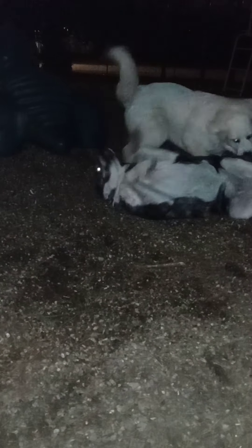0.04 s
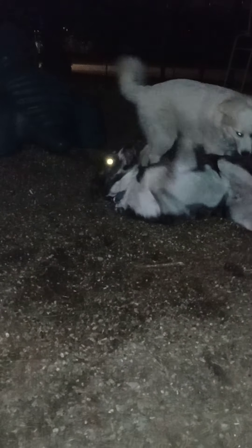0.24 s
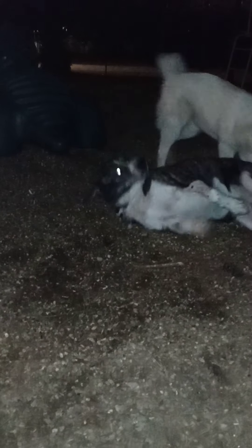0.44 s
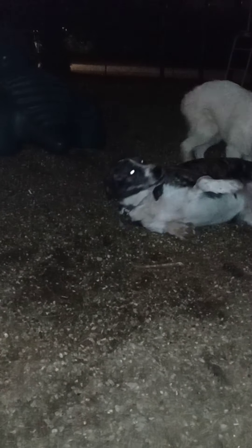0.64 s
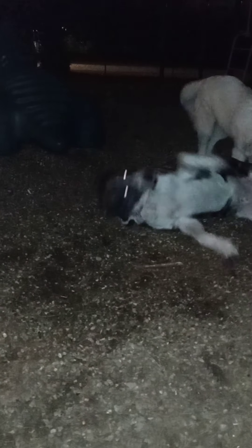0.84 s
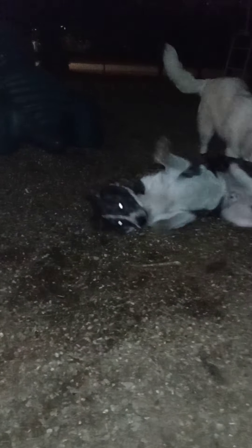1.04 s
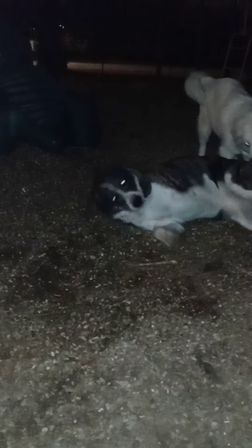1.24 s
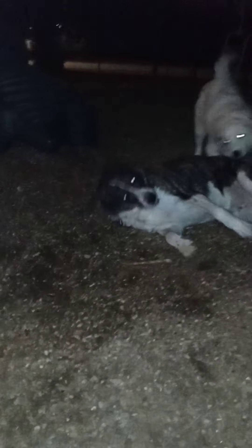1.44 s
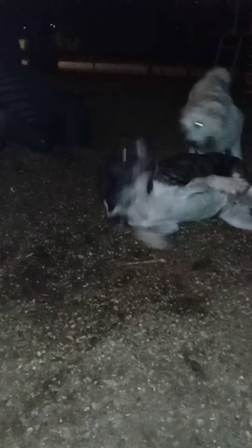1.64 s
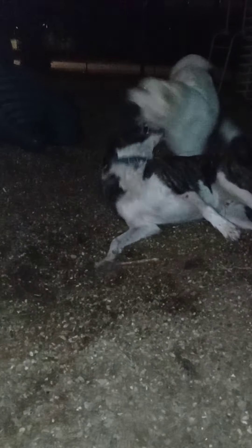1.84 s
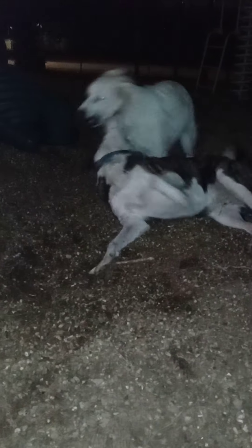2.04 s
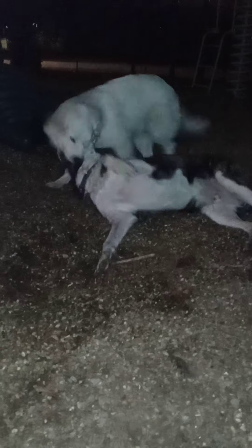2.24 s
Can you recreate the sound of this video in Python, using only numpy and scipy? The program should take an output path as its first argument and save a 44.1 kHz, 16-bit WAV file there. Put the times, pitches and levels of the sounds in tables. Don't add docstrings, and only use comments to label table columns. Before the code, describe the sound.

Dogs scuffling on loose gravel, pebbles clacking, with a snort, jaw snap and jingling collar tags.

```python
import sys
import numpy as np
from scipy import signal
from scipy.fft import rfft, irfft
from scipy.io import wavfile
from scipy.ndimage import uniform_filter1d

SR = 44100
rng = np.random.default_rng(int(sys.argv[2]) if len(sys.argv) > 2 else 0)


def convert_level_to_amplitude(level_db):
    exponent = np.asarray(level_db, float) / 20
    return 10 ** exponent


def output_pcm(signal):
    pcm = np.clip(np.atleast_2d(signal).T, -1, 1) * 32767
    wavfile.write(sys.argv[1], SR, np.round(pcm).astype(np.int16))


N = 99225
T = np.arange(N) / SR


def rms_one(x):
    return x / np.sqrt(np.mean(x ** 2) + 1e-20)


def cut(x, hz, kind, order=2):
    return signal.sosfilt(signal.butter(order, hz, kind, fs=SR, output="sos"), x)


def drift(rate):
    r = np.exp(-32 * np.pi * rate / SR)
    noise = rng.standard_normal(N // 16 + 1002)
    slow = rms_one(signal.lfilter([1], [1, -2 * r, r * r], noise)[1000:])
    return np.interp(np.arange(N) / 16, np.arange(len(slow)), slow)


def ring(x, hz, t60):
    r, w = convert_level_to_amplitude(-60 / (t60 * SR)), 2 * np.pi * hz / SR
    return signal.lfilter([0, np.sin(w)], [1, -2 * r * np.cos(w), r * r], x + 1e-18)


def resonance_filter(hz, width_hz):
    r = np.exp(-np.pi * width_hz / SR)
    return np.array([1, 0, -1]) * (1 - r * r) / 2, [1, -2 * r * np.cos(2 * np.pi * hz / SR), r * r]


def resonance(x, hz, width_hz):
    return signal.lfilter(*resonance_filter(hz, width_hz), x)


def glide(x, hz, width_hz):
    out, state = np.zeros(len(x)), np.zeros(2)
    for i in range(0, len(x), 128):
        b, a = resonance_filter(hz[i], width_hz)
        out[i:i + 128], state = signal.lfilter(b, a, x[i:i + 128], zi=state)
    return out


def swell(start, length, edge):
    return np.sin(np.pi / 2 * np.clip(np.minimum(T - start, start + length - T) / edge, 0, 1)) ** 2


def hump(peak, rise, fall):
    return np.exp(-np.where(T < peak, ((peak - T) / rise) ** 2, 2 * (T - peak) / fall))


def clicks(s, gains):
    out = np.zeros(N)
    np.add.at(out, (np.asarray(s) * SR).astype(int), gains)
    return out


def rumble():
    # pitch in Hz, level in dB per Hz.
    traffic = [(20, -39), (50, -17), (85, -0.5), (165, -5), (230, -10.5), (320, -24.5), (430, -35.5),
               (1500, -40)]
    at, db = np.transpose(traffic)
    hz = np.arange(N // 2 + 1) * SR / N
    colour_db = np.interp(np.log(hz + 1), np.log(at), db, left=-60, right=-60)
    noise = irfft(rfft(rng.standard_normal(N)) * convert_level_to_amplitude(colour_db), N)
    return convert_level_to_amplitude(-49.5 + 0.58 * drift(5.2)) * rms_one(noise)


def whistles():
    # start in seconds, length in seconds, pitch in Hz, level in dB.
    nose_tones = [
        (1.822, .068, 3000, -50),
        (1.725, .06, 2960, -56),
        (2.0, .045, 2550, -54),
        (1.885, .045, 2800, -57),
    ]
    waver = np.cumsum(20 * drift(40)) / SR
    out = np.zeros(N)
    for start, length, hz, db in nose_tones:
        level = convert_level_to_amplitude(db + 2.0 * drift(40)) * swell(start, length, 0.0084)
        out += level * np.sin(2 * np.pi * (hz * T + waver))
    return out


def pants():
    # start in seconds, length in seconds, level in dB, mouth pitch in Hz, mouth pitch at the end in Hz.
    breaths = [(0, 0.15, -69, 1360, 1390), (0.206, 0.082, -68, 830, 850), (0.212, 0.21, -61.5, 1530, 1330),
               (0.302, 0.044, -67.5, 920, 890), (0.388, 0.065, -57, 890, 890),
               (.395, 0.063, -54.5, 1380, 1220), (0.464, 0.088, -66, 1460, 1450),
               (0.514, 0.079, -61.5, 870, 813), (0.527, 0.085, -63, 393, 376),
               (0.513, 0.13, -62, 1490, 1450), (0.649, 0.1, -71.5, 900, 850),
               (0.748, 0.058, -63.5, 890, 840), (0.942, 0.08, -59.5, 915, 810),
               (1.586, 0.12, -56, 1670, 1600), (1.598, 0.073, -71, 775, 710),
               (1.714, 0.085, -53, 1280, 1630), (1.734, 0.064, -53.5, 1770, 2060),
               (1.722, 0.1, -64.5, 970, 790), (1.819, 0.066, -61, 1090, 1140),
               (1.826, 0.11, -57.5, 1540, 1610), (1.849, 0.065, -70, 710, 710),
               (1.916, 0.036, -48.5, 900, 880), (1.936, 0.05, -55.5, 800, 740),
               (1.949, 0.046, -38, 875, 885), (1.956, 0.024, -47.5, 1490, 1270),
               (2.002, 0.066, -59.5, 890, 800), (2.054, 0.037, -51, 830, 764),
               (2.048, 0.076, -57, 950, 935), (2.136, 0.042, -45, 960, 970),
               (2.157, 0.056, -43.5, 1050, 910), (2.159, 0.028, -45.5, 1350, 1200)]
    # pitch in Hz, width in Hz, level in dB.
    throat_peaks = [(2055, 103, -15), (2700, 140, -16)]
    pulse_hz, pulse_jitter, breath_share, edge_s = 84.56, 0.25, 0.82, 0.016
    phase = np.cumsum(pulse_hz * (1 + pulse_jitter * drift(50))) / SR
    puff = np.exp(-3.0 * (phase % 1)) * convert_level_to_amplitude(0.6 * drift(51))
    pulses = rms_one(cut(np.diff(puff, prepend=0).clip(0), 1150, "low"))
    breath = rms_one((3.6 + puff) * rng.standard_normal(N))
    flow = np.sqrt(1 - breath_share) * pulses + np.sqrt(breath_share) * breath
    mouth, throat = np.zeros(N), np.zeros(N)
    for start, length, db, hz, end_hz in breaths:
        part = slice(int(start * SR), int((start + length) * SR) + 1500)
        effort = convert_level_to_amplitude(db) * swell(start, length, edge_s)[part]
        track = np.interp(T[part], [start, start + length], [hz, end_hz])
        voice = glide(flow[part], track, 160 * (hz / 900) ** 0.55)
        voice = glide(voice, track, hz / 4)
        even = voice / np.sqrt(uniform_filter1d(voice ** 2, size=900) + 1e-12)
        mouth[part] += effort * even
        throat[part] += convert_level_to_amplitude(27.5) * effort * flow[part]
    upper = sum(convert_level_to_amplitude(db) * resonance(throat, hz, width_hz) for hz, width_hz, db in throat_peaks)
    return mouth - cut(upper, [1850, 3300], "band", order=3)


def snap():
    # time in seconds, peak in dB, pitch in Hz, time to fall 60 dB in seconds.
    jaw_rings = [
        (.922, -21, 1165, 0.03),
        (0.9234, -24.5, 1440, 0.021),
        (0.9232, -38, 2020, 0.017),
        (.923, -40, 770, 0.03),
        (.924, -37.5, 510, 0.061),
        (0.925, -38, 297, 0.024),
    ]
    knock = sum(ring(clicks([s], convert_level_to_amplitude(db)), hz, t60) for s, db, hz, t60 in jaw_rings)
    return cut(cut(knock, 270, "high", order=4), 3900, "low")


def snort():
    # peak time in seconds, rise in seconds, fall in seconds, level in dB.
    blasts = [
        (0.925, 0.041, 0.016, -24),
        (0.98, 0.052, 0.034, -45.5),
        (0.854, 0.044, 0.032, -41.5),
    ]
    # pitch in Hz, width in Hz, level in dB.
    nostrils = [(4840, 2500, -3.5), (2700, 870, -0.5), (1940, 290, 2.5), (1070, 1300, -9.5),
                (8660, 5800, -10.5)]
    air = convert_level_to_amplitude(2.16 * drift(117)) * rng.standard_normal(N)
    nose = np.zeros(N)
    for k, (hz, width_hz, db) in enumerate(nostrils):
        nose += convert_level_to_amplitude(db) * resonance(air, hz, width_hz) * (-1) ** k
    power = sum(convert_level_to_amplitude(2 * db) * hump(peak, rise, fall) for peak, rise, fall, db in blasts)
    return np.sqrt(power) * cut(rms_one(nose), [750, 9200], "band", order=3)


def tags():
    # time in seconds, peak in dB, loudest pitch in Hz, free ringing in seconds.
    touches = [(1.01, -21.5, 9450, 0.0028), (1.0092, -37, 8300, 0.0076), (1.019, -38, 8950, .002),
               (1.031, -27, 10050, 0.0026), (1.0316, -31, 8300, 0.00083), (1.034, -31.5, 7280, 0.0046),
               (1.0823, -31, 8950, 0.0034), (1.337, -45, 8300, 0.0082), (1.337, -20, 11600, 0.0072),
               (1.347, -20.5, 7280, 0.017), (1.3655, -22.5, 7280, .007), (1.388, -25.5, 7280, 0.0027),
               (1.404, -26, 11600, .003), (1.417, -24, 7280, 0.0048), (1.418, -28, 10050, 0.016),
               (1.431, -12, 7280, 0.0018), (1.437, -29, 7280, 0.015), (1.448, -22.5, 7280, 0.0075),
               (1.465, -20, 7280, 0.008), (1.4655, -32, 10050, .005), (1.472, -35, 7280, .003),
               (1.489, -29.5, 10050, 0.0036), (1.5135, -21.5, 10050, 0.0015), (1.5148, -27, 10050, 0.0091),
               (1.515, -39, 8300, 0.0044), (1.667, -16.5, 7280, 0.0022), (1.667, -26, 12200, 0.0035),
               (1.674, -26.5, 8300, 0.00071), (1.682, -21, 12200, 0.0026), (1.746, -33, 7280, 0.0029)]
    # pitch in Hz, level in dB, time to fall 60 dB when free in seconds.
    modes = [(7280, 0, .15), (8300, 0, .1), (8950, 0, .05), (9450, 0, .05), (10050, 0, .08),
             (11600, 0, .08), (12200, 0, .06), (15720, 9, .035)]
    favour_db, favour_hz, damped_t60_s = 20, 250, 0.013
    luck = rng.normal(0, 5, (len(touches), len(modes)))
    t, rings = T[:4000], np.zeros(N)
    hz, level_db, t60 = np.transpose(modes)[:, :, None]
    for (s, db, pitch, free), chance in zip(touches, luck):
        nearness = np.exp(-((pitch - hz) / favour_hz) ** 2)
        favour = (chance[:, None] - favour_db) * (0.5 - nearness)
        loss_db = 60 * (t / t60 + np.clip(t - free, 0, None) / damped_t60_s)
        mode_level = convert_level_to_amplitude(db - 14.5 + level_db + favour - loss_db)
        rings[int(s * SR):][:len(t)] += np.sum(mode_level * np.sin(2 * np.pi * hz * t), axis=0)
    s, db, _, free = np.transpose(touches)
    hit = clicks(s, convert_level_to_amplitude(db - 4 - 700 * free))
    tick = signal.lfilter([1], [1, -convert_level_to_amplitude(-60 / (0.011 * SR))], hit) * rng.standard_normal(N)
    return cut(rings, 6360, "high", order=4) + cut(tick, [7000, 14000], "band")


def pebbles():
    # time in seconds, peak in dB, weight of the low knock in dB.
    clacks = [(0.2208, -26, 14), (0.2454, -2.5, -1), (0.307, -32, -4), (0.4090, -2.5, 1.5), (0.42, -17, 8),
              (0.473, -10.5, -6), (0.4852, -9.5, -12), (0.5654, -12, -16), (0.5876, -2, -12),
              (0.7212, -6, -6), (0.738, -12, -5), (1.009, -10.5, 4), (1.0195, -10.5, -1), (1.038, -13, -15),
              (1.0516, -18, -15), (1.033, -19, -20), (1.084, -23, -4), (1.132, -20, -13),
              (1.1486, -3.5, -6), (1.3225, -3.5, -17), (1.4042, -25, -8), (1.4725, -24, 2),
              (1.477, -21, -10), (1.478, -10, -19), (1.491, -10, -15), (1.551, -15, -5), (1.5738, -22, -12),
              (1.6562, -8.5, -15), (1.666, -10.5, 5.5), (1.674, -11, 0), (1.6803, -7, -18),
              (1.685, -13, -12), (1.913, -27, -8), (2.0725, -8.5, -3), (2.0765, -10, 6)]
    s, db, weight_db = np.transpose(clacks)
    splinter, out = rng.standard_normal(N), np.zeros(N)
    for level_db, band in ((db, [3600, 18000]), (db + weight_db, [1760, 3600])):
        hit = clicks(s, convert_level_to_amplitude(level_db - 7.5))
        tail = signal.lfilter([1], [1, -convert_level_to_amplitude(-60 / (0.009 * SR))], hit) * splinter
        out += cut(hit + convert_level_to_amplitude(-17) * tail, band, "band", order=3)
    return out


def gravel():
    # time in seconds, level in dB, weight of the heavier stones in dB.
    shuffle = [
        (0, -48, -6),
        (.19, -58.5, -5.5),
        (.41, -42, -9),
        (.54, -46, -7),
        (.77, -40, -10),
        (1.0, -46.5, -11.5),
        (1.42, -47, -14),
        (1.54, -55.5, -4.5),
        (1.7, -50, -1.5),
        (2.25, -52, -9.5),
    ]
    # peak in seconds, rise in seconds, fall in seconds, level in dB, weight in dB.
    drags = [(.09, 0.029, 0.071, -44, -4), (.247, 0.00099, 0.016, -29, -15),
             (0.268, 0.01, 0.016, -25.5, -17.5), (0.31, 0.0034, 0.017, -33, -10),
             (0.414, 0.0074, 0.023, -38.5, -11), (0.57, 0.003, 0.016, -34.5, -10.5),
             (0.619, 0.035, 0.05, -40, -9.5), (0.693, 0.044, 0.047, -32, -15),
             (1.137, 0.026, .01, -38, -19), (1.169, .015, 0.014, -33.5, -14.5),
             (1.261, 0.01, 0.042, -40.5, -36), (1.327, 0.038, 0.025, -36.5, -15.5),
             (1.48, 0.014, 0.021, -38.5, -40), (1.573, .001, 0.019, -40, -21),
             (1.641, 0.082, 0.12, -43.5, -9.5), (1.682, 0.0035, 0.016, -41.5, -20),
             (1.918, 0.004, 0.033, -36, -10), (1.966, 0.015, 0.047, -40.5, 0.5),
             (2.075, 0.0053, 0.053, -41.5, -4.5)]
    grains_per_s, grain_spread_db, patchy_db = 3500, 4.5, 2.0
    stone_count, stone_cycles = 14, 15.5

    s, level_db, weight_db = np.transpose(shuffle)
    light = convert_level_to_amplitude(2 * np.interp(T, s, level_db))
    heavy = convert_level_to_amplitude(2 * np.interp(T, s, level_db + weight_db))
    for peak, rise, fall, db, weight in drags:
        shape = hump(peak, rise, fall)
        light += convert_level_to_amplitude(2 * db) * shape
        heavy += convert_level_to_amplitude(2 * (db + weight)) * shape

    sizes = convert_level_to_amplitude(grain_spread_db * np.minimum(rng.exponential(1, N), 4)) * rng.choice([-1, 1], N)
    grains = rms_one(sizes * (rng.random(N) < grains_per_s * convert_level_to_amplitude(5 * drift(60)) / SR))
    rustle = convert_level_to_amplitude(0.32 * drift(55)) * rng.standard_normal(N)
    rub = cut(grains + rustle, 4340, "high", order=3)
    edges = np.geomspace(3000, 17000, num=7)
    grit = np.zeros(N)
    for k, band in enumerate(zip(edges, edges[1:])):
        grit += convert_level_to_amplitude(patchy_db * drift(8.1)) * cut(rub, list(band), "band") * (-1) ** k

    dealt = rng.integers(0, stone_count, N)
    stones = np.zeros(N)
    for k, hz in enumerate(np.geomspace(1458, 3253, num=stone_count)):
        struck = (grains + rng.standard_normal(N)) * (dealt == k)
        level = convert_level_to_amplitude(6.3 * np.log2(hz / 2000) + patchy_db * drift(12.0))
        stones += level * rms_one(ring(struck, hz, stone_cycles / hz))
    stones = cut(cut(stones, 1690, "high", order=4), 2400, "low")
    return np.sqrt(light) * rms_one(grit) + np.sqrt(heavy) * rms_one(stones)


def scene():
    near = gravel() + snort() + pebbles() + tags() + pants() + snap() + whistles()
    dull = cut(near, 6600, "low")
    echo = sum(np.pad(dull, (int(lag_s * SR), 0))[:N] for lag_s in (.009, .017, .026))
    return (near + convert_level_to_amplitude(-22) * echo + rumble())[None]


def low_pass(x):
    return signal.sosfilt(signal.butter(12, 17150, fs=SR, output="sos"), x)


def record(dry):
    # pitch in Hz, width in Hz, peak or dip in dB.
    port = [(1140, 67, -2.5), (1695, 240, -9.5), (1970, 250, 1), (2250, 170, -1.5), (3565, 510, -7.5),
            (4970, 440, 7.5), (6090, 638, 11), (7256, 1370, -7.5), (8430, 1200, 10.5), (11530, 1130, -11.5),
            (13400, 5200, -1), (15700, 810, 5)]
    x = cut(dry, 8400, "low", order=1)
    for hz, width_hz, db in port:
        x = x + (convert_level_to_amplitude(db) - 1) * resonance(x, hz, width_hz * max(1, convert_level_to_amplitude(-db / 2)))
    x = signal.sosfilt(signal.cheby2(14, 32, 16100, fs=SR, output="sos"), x)
    return low_pass(x)


dry = scene()
out = record(dry)
output_pcm(out)
```